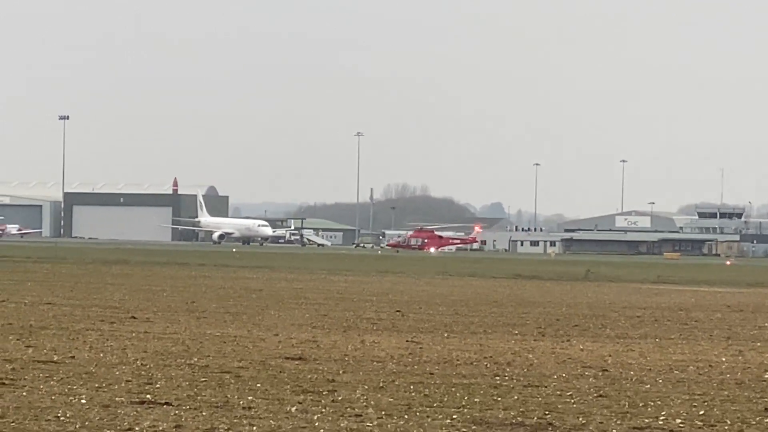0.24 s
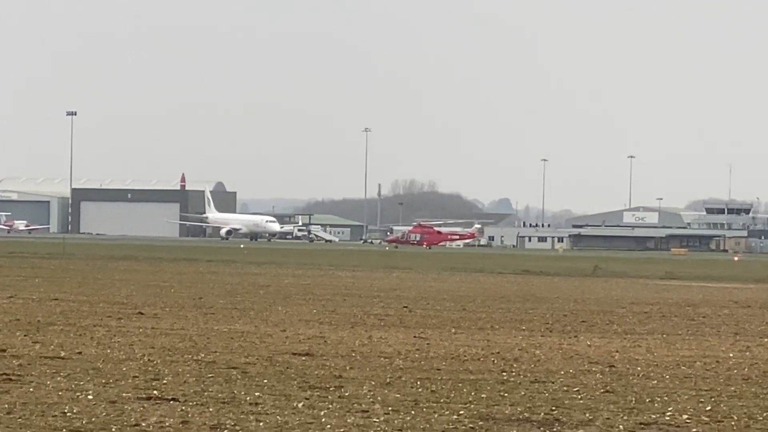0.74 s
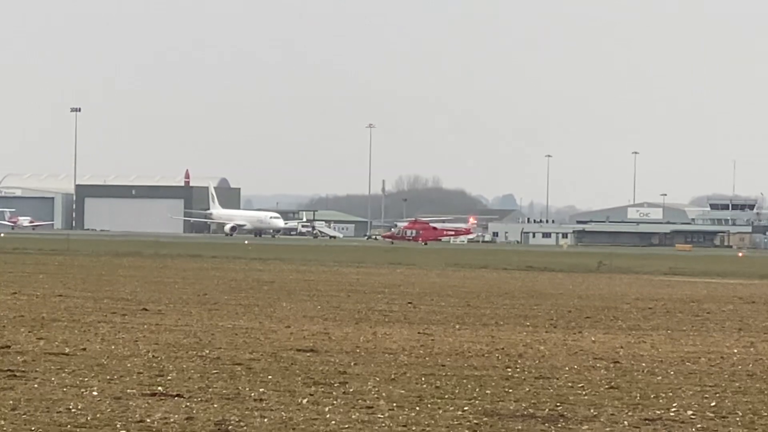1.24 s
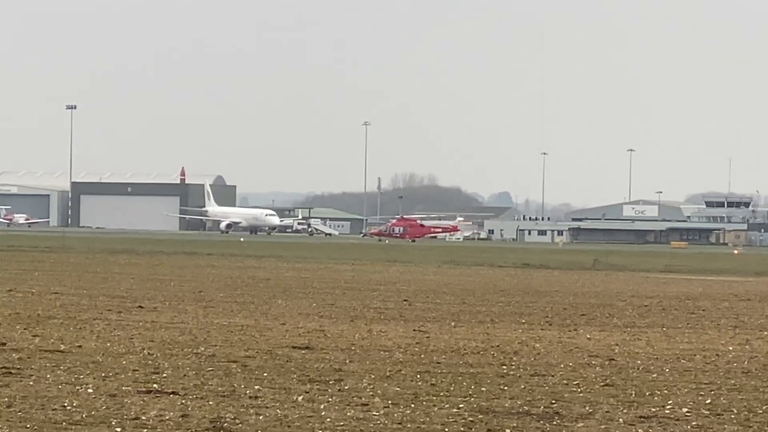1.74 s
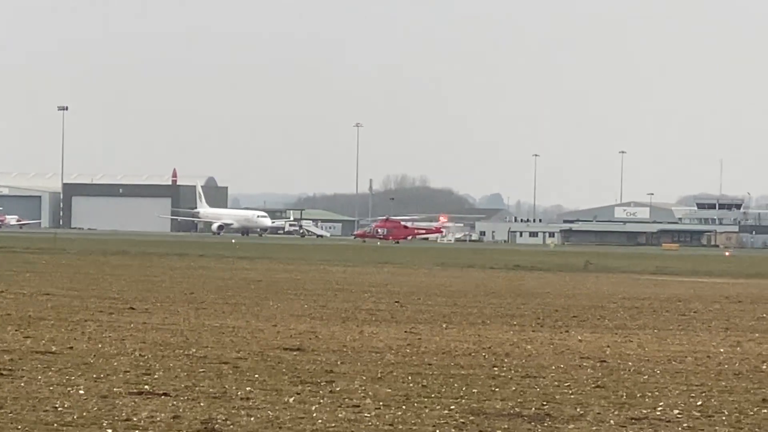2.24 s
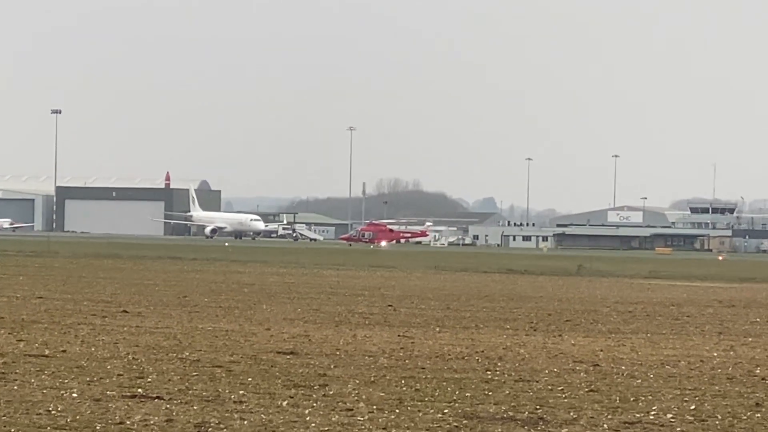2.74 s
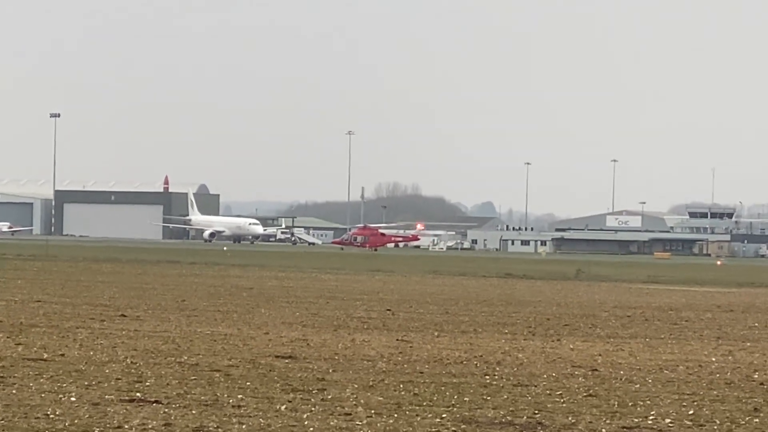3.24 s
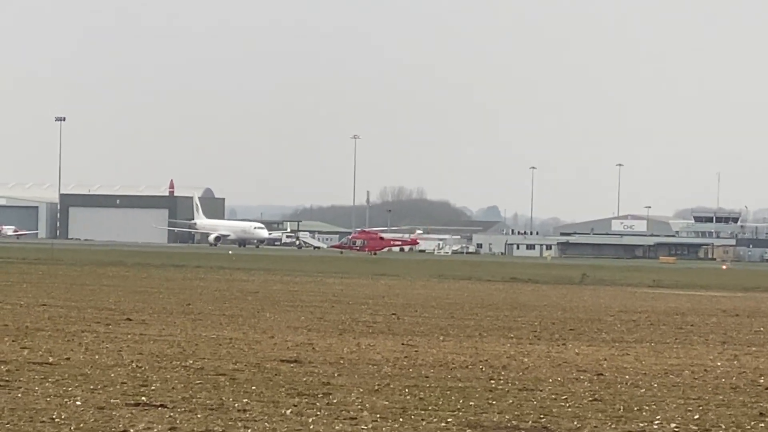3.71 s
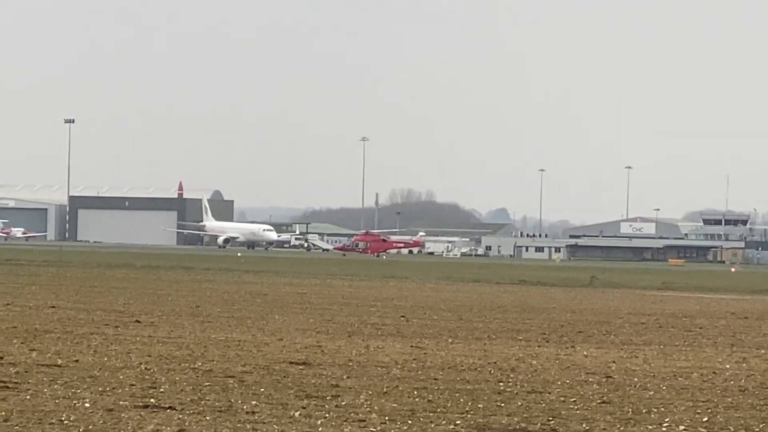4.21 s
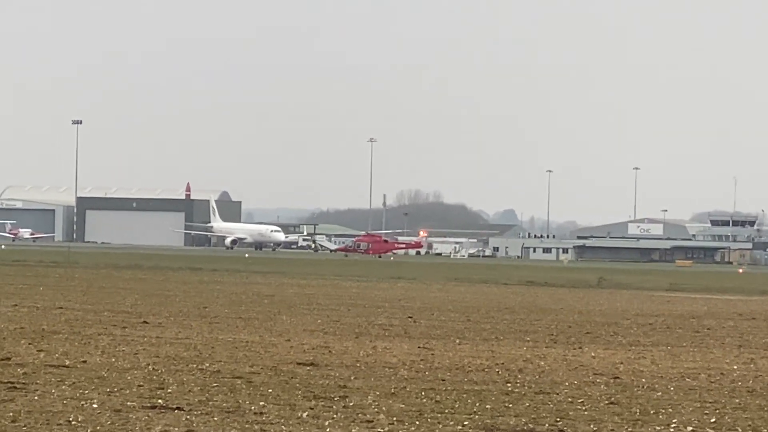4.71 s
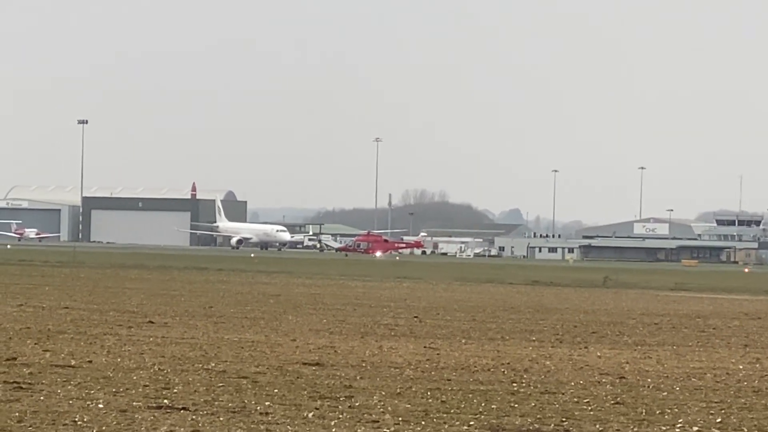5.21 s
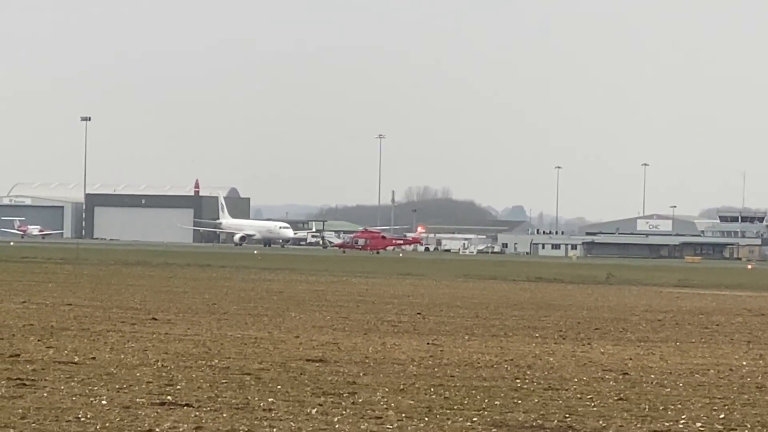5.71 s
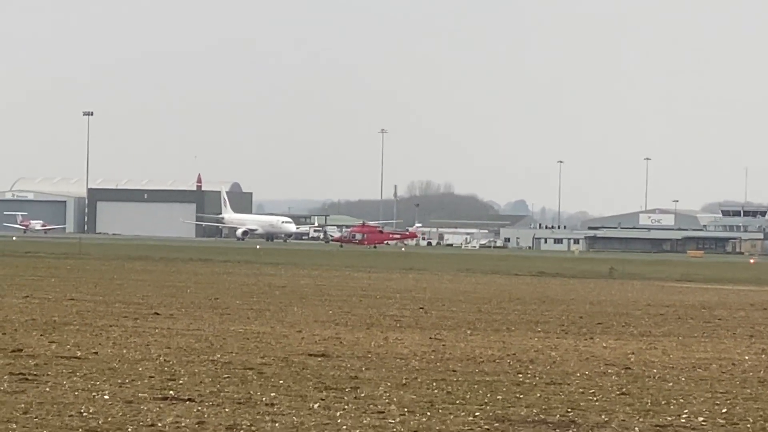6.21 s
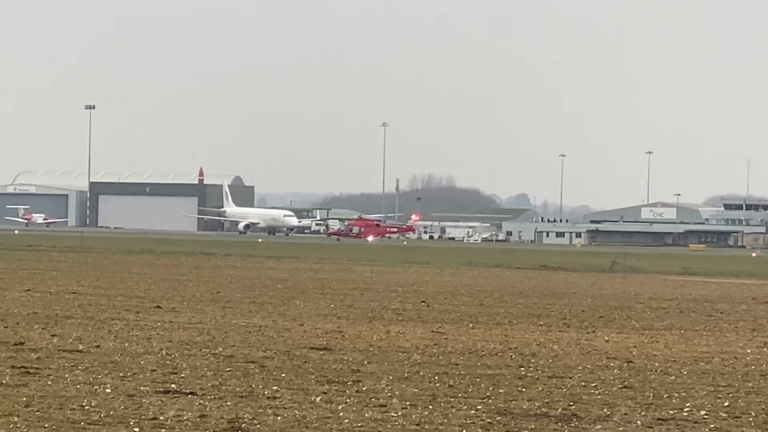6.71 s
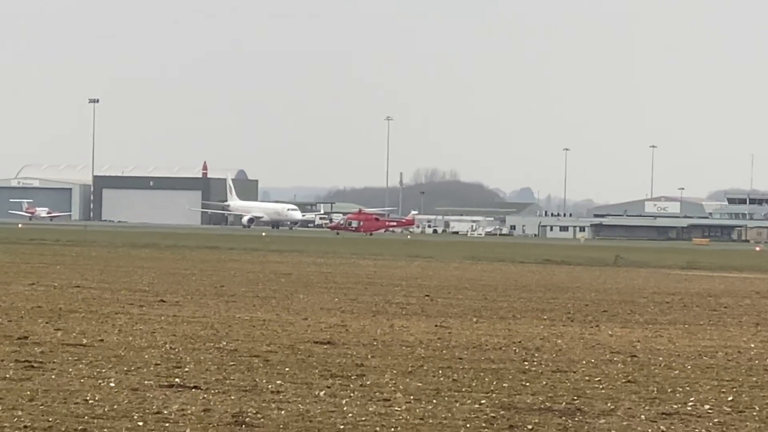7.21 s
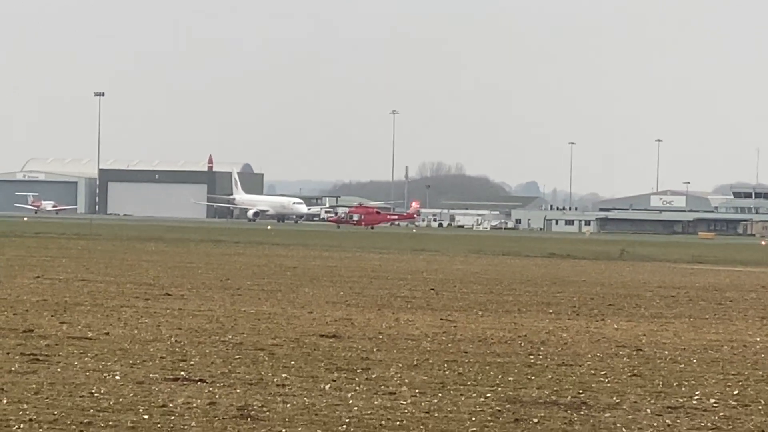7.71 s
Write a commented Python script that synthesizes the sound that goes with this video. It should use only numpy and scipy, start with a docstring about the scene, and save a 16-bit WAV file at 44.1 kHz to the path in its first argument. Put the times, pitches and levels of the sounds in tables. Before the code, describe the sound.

A distant helicopter drones and whooshes steadily across an airfield while an unseen car accelerates past, its note sagging, and wind thumps the microphone.

```python
"""A helicopter hover-taxis far across an airfield throughout: sine rotor tones, a throbbing noise wash and
turbine noise whose bands drift with the air. A car, its engine built from exhaust harmonics and its tyres
from noise, accelerates past out of sight; its note sags as it goes by and climbs again. Now and then wind
puffs, short low sine bursts with turbulence, thump the microphone; late on a bird, two gliding sines, chirps."""
import sys
import numpy as np
from scipy import signal
from scipy.fft import rfft, irfft, next_fast_len
from scipy.io import wavfile
from scipy.ndimage import uniform_filter1d, map_coordinates

SR = 44100
rng = np.random.default_rng(int(sys.argv[2]) if len(sys.argv) > 2 else 0)


def put_to_file(sound):
    """Save the sound as 16-bit audio at rate SR, in the file named by the first command-line argument."""
    columns = np.atleast_2d(sound).T  # one column per channel
    safe = np.clip(columns, -1, 1)
    whole_steps = np.round(safe * 32767)
    wavfile.write(sys.argv[1], SR, whole_steps.astype(np.int16))


N = 350595

PASS_S = 5.375  # when the car is nearest
# The car's side. Each row: time in seconds, side (positive is louder at left, negative at right).
BEARING = [(0, 0.047), (2, 0.36), (3.1, 0.73), (5.3, 0.69), (5.95, 0.23), (6.5, -0.51), (7.95, -0.48)]


def amp(db):
    """Decibels to gain."""
    return 10 ** (np.asarray(db) / 20)


def unit(x):
    """x at rms 1."""
    return x / np.sqrt(np.mean(x ** 2) + 1e-20)


def clock():
    """The time of each sample in seconds."""
    return np.arange(N) / SR


def curves(rows):
    """One value per sample for each column after the time."""
    s, *cols = np.transpose(rows)
    return [np.interp(clock(), s, c) for c in cols]


def wobble(knots_per_s):
    """A smooth random curve through normally distributed knots."""
    knots = rng.standard_normal(256)
    coarse_s = clock()[::64]
    curve = map_coordinates(knots, [coarse_s * knots_per_s], mode="wrap")
    return np.interp(clock(), coarse_s, curve)


def bell(s, width_s):
    """A smooth Gaussian swell of height 1 around time s; width_s is its standard deviation."""
    return np.exp(-.5 * np.minimum(((clock() - s) / width_s) ** 2, 200))


def filtered(x, response):
    """x times a response of frequency, with zero padding against wrap-around."""
    m = next_fast_len(N + SR // 2)
    return irfft(rfft(x, m) * response(np.fft.rfftfreq(m, 1 / SR)), m)[..., :N]


def rush(colour, patchy_db):
    """Coloured noise of rms 1, in time-frequency patches that come and go as the air stirs."""
    z = signal.stft(rng.standard_normal(N), nperseg=1024)[2]
    field = uniform_filter1d(rng.standard_normal(z.shape), size=9, axis=0)
    field = uniform_filter1d(field, size=26, axis=1)
    noise = signal.istft(z * amp(patchy_db * unit(field)), nperseg=1024)[1][:N]
    f, db = np.transpose(colour)
    return unit(filtered(noise, lambda hz: amp(np.interp(np.log(hz + 1), np.log(f), db))))


def wide(colour, patchy_db, side_db):
    """A stereo rush: a centre plus a diffuse part, opposite in the two channels."""
    mid = rush(colour, patchy_db)
    side = amp(side_db) * rush(colour, patchy_db)
    return np.array([mid + side, mid - side])


def aside(pair, right_lead_ms, left_db):
    """Place a source by the right channel's time lead and the left channel's excess level."""
    t = clock()
    shift_s = right_lead_ms / 2000  # half to each channel
    left = amp(left_db / 2) * np.interp(t - shift_s, t, pair[0])
    right = amp(-left_db / 2) * np.interp(t + shift_s, t, pair[1])
    return np.array([left, right])


def focused(pair, drift, octaves):
    """Bent by the wind, one drifting band arrives stronger or weaker than its neighbours."""
    hz, t, z = signal.stft(pair, SR, nperseg=1024)
    s, centre_hz, boost_db = np.transpose(drift)
    offset = np.log2((hz[:, None] + 1) / np.interp(t, s, centre_hz)) / octaves
    gain_db = np.interp(t, s, boost_db) * np.exp(-.5 * offset ** 2)
    return signal.istft(z * amp(gain_db), SR, nperseg=1024)[1][:, :N]


def rotors(blade_hz=28.91, throb=0.08, waver_db=0.5):
    """Main rotor drones, the tail rotor's tone fades and returns, beating against it; wash swells per blade."""
    # Each row: time in seconds, wash level in dB, tail rotor gain in dB.
    rotor_level = [(0, -38.5, -3.5), (.7, -39, 0), (1.3, -38, -1), (1.85, -36, 2), (2.3, -37.5, -1.5),
                   (3.1, -36, -2), (3.8, -37, -5.5), (4.25, -35.5, -6), (4.7, -32.5, -6), (5.4, -31.5, -6),
                   (5.9, -33.5, 1), (6.5, -39, 4), (7.05, -34.5, -1.5), (7.4, -33.5, -1), (7.95, -38, -8)]
    # Each row: frequency in Hz, relative level in dB per Hz.
    wash_colour = [(15, -31.5), (25, -19.5), (35, -14), (44, -7), (52, 2.5), (68, 1.5), (100, 0), (130, -4),
                   (200, -10), (300, -20), (500, -27.5), (900, -31.5), (2000, -94)]
    # Rotor tones. Each row: frequency in Hz, rms level in dB (the tail's before its gain).
    main_tones = [(28.91, -55.5), (57.81, -38.5), (86.74, -42.5)]
    tail_tones = [(81.8, -36), (163.6, -56)]
    t = clock()
    wash_level_db, tail_gain_db = curves(rotor_level)

    def tone(hz):
        level = np.sqrt(2) * amp(waver_db * wobble(4.1))
        return level * np.sin(2 * np.pi * (hz * t + rng.random()) + wobble(5) / 10)

    def drone(rows):
        return sum(amp(db) * tone(hz) for hz, db in rows)

    tones = drone(main_tones) + amp(tail_gain_db) * drone(tail_tones)
    beat = 1 + throb * np.cos(2 * np.pi * blade_hz * t)
    wash = amp(wash_level_db) * beat * wide(wash_colour, patchy_db=1, side_db=-13.5)
    return aside(tones + wash, right_lead_ms=0.51, left_db=0.3)


def turbines(hiss_trim_db=-1.5, fizz_trim_db=-1, flutter_db=0.32):
    """Exhaust roar, intake rush, hiss and treble fizz: noise bands that swell and fade with the air."""
    # Each row: time in seconds, roar level in dB, intake level in dB, hiss level in dB before trim.
    turbine_level = [(0, -46, -60.5, -86.5), (.5, -51.5, -64.5, -79.5), (.8, -50.5, -64.5, -77.5),
                     (1.15, -52.5, -61.5, -75.5), (1.75, -48.5, -59.5, -72), (2, -51.5, -60.5, -74.5),
                     (2.55, -51, -61.5, -76), (2.76, -50.5, -57.5, -68.5), (3.05, -49, -60, -72),
                     (3.35, -48.5, -58.5, -70.5), (3.8, -50, -56.5, -67), (4.25, -47.5, -57, -68),
                     (4.6, -46, -57, -74.5), (4.95, -47, -51, -69), (5.3, -49, -56, -72),
                     (5.5, -50, -59.5, -68), (5.8, -48.5, -62, -72.5), (6.0, -54.5, -67, -73),
                     (6.3, -56.5, -67.5, -75.5), (6.55, -53.5, -64.5, -75), (6.78, -52.5, -59.5, -67),
                     (7.3, -49.5, -61.5, -68.5), (7.95, -54, -64.5, -72)]
    # Each row: time in seconds, fizz level in dB before trim.
    fizz_level = [(0, -99), (.8, -96), (1.7, -84.5), (2.35, -93.5), (3.3, -78), (4.15, -68.5),
                  (4.75, -79.5), (5.1, -75.5), (6.45, -85), (6.75, -77.5), (7.95, -84.5)]
    # Noise colours. Each row: frequency in Hz, relative level in dB per Hz.
    roar_colour = [(300, -24), (600, -6), (900, 1), (1150, 0.5), (1500, 4), (2100, 2), (2600, -1),
                   (3000, -19), (3800, -24.5), (6000, -66)]
    intake_colour = [(1800, -28), (2800, 2.5), (3300, -1.5), (3850, -3.5), (4250, -9.5), (5000, -13.5),
                     (6200, -23.5), (9000, -55)]
    hiss_colour = [(3500, -25.5), (5000, -3), (6500, 2.5), (7300, 0.5), (7900, -1.5), (8300, -3.5),
                   (10000, -24.5)]
    fizz_colour = [(6500, -24), (8400, 4.5), (10000, -1.5), (12300, -3), (13000, -18)]
    # Drifting bands: roar, its upper edge, hiss, fizz. Each row: time in seconds, centre in Hz, boost in dB.
    roar_focus = [(0, 1100, 5.5), (.35, 1380, 5), (.7, 1370, 6), (1.1, 1680, 0), (1.7, 2160, 2),
                  (1.95, 1500, -2.5), (2.3, 1130, 10), (2.75, 1239, 0.5), (3.2, 1270, 5), (4.4, 1669, 0.5),
                  (4.7, 1950, 2), (4.95, 1980, 7), (5.15, 2020, 5), (5.5, 2160, 2.5), (6.6, 1778, -1.5),
                  (7.3, 2200, 7), (7.95, 2221, 0.5)]
    edge_focus = [(0, 2920, 3), (.6, 2600, -3), (1.2, 2500, 1), (2.4, 2510, -1.5), (3.3, 2400, -0.5),
                  (3.8, 2429, 4.5), (4.4, 2450, -2.5), (5.0, 2450, 5.5), (5.5, 2450, -1), (6.4, 2450, -2.5),
                  (7.2, 2400, 1), (7.95, 2400, -1)]
    hiss_focus = [(0, 5300, 0), (1, 5230, 2), (2.7, 5280, 7), (3.8, 5200, -1), (4.95, 4996, 2),
                  (5.5, 5200, -3), (6.2, 5600, -6), (7.95, 5200, -3.5)]
    fizz_focus = [(0, 9000, 8), (2, 9300, 6), (3.4, 9550, 4.5), (4.2, 10000, 2), (5.2, 11300, 5.5),
                  (6.2, 11600, 4), (6.8, 11700, 9.5), (7.95, 11700, 8.5)]

    roar_db, intake_db, hiss_db = curves(turbine_level)
    fizz_db, = curves(fizz_level)
    roar = amp(roar_db) * wide(roar_colour, patchy_db=1.62, side_db=-30.5)
    roar = focused(roar, roar_focus, octaves=0.13)
    roar = focused(roar, edge_focus, octaves=.09)
    intake = amp(intake_db) * wide(intake_colour, patchy_db=1.74, side_db=-19.0)
    hiss = amp(hiss_trim_db + hiss_db) * wide(hiss_colour, patchy_db=1.6, side_db=-27.5)
    hiss = focused(hiss, hiss_focus, octaves=.14)
    fizz = amp(fizz_trim_db + fizz_db) * wide(fizz_colour, patchy_db=1.4, side_db=-8)
    fizz = focused(fizz, fizz_focus, octaves=.09)
    return (roar + intake + hiss + fizz) * amp(flutter_db * wobble(14))


def engine(cylinders=8, waver_db=2.03):
    """Exhaust: firing note, boom an octave below, and uneven cylinders' overtones, loudest as it goes by."""
    # Each row: time in seconds, firing rate in Hz, firing note level in dB, half-rate boom level in dB.
    exhaust = [(0, 106.2, -46.5, -47), (.25, 115.3, -38, -51), (.85, 136, -42.5, -45.5),
               (1.35, 141.1, -39, -42), (2.3, 142, -38, -37.5), (3.2, 155.6, -34, -38),
               (3.66, 162.3, -35, -28.5), (4.08, 163.7, -35, -30.5), (4.27, 146.6, -33, -38),
               (4.45, 140, -30.5, -32.5), (4.8, 132.4, -29, -34.5), (5.18, 125.3, -35.5, -36),
               (5.5, 127.4, -33, -37.5), (6.25, 135.2, -39, -37), (6.62, 138.8, -31.5, -32),
               (7.15, 143.5, -43.5, -41.5), (7.95, 150.8, -50, -46.5)]
    # Each row: time in seconds, overall overtone level in dB.
    rasp_level = [(0, -67), (.6, -65), (1.2, -66), (2.2, -65), (2.8, -62), (3.4, -57.5), (4.5, -56),
                  (5, -57), (5.35, -55), (5.7, -60), (6.05, -62.5), (6.5, -59.5), (7, -63.5), (7.95, -66)]
    # Each row: multiple of the engine's cycle rate, relative level in dB.
    overtones = [(12, 4), (15, -2), (16, 9), (18, 3.5), (19, -2), (20, 7), (21, -1), (22, 5.5), (23, 1.5),
                 (24, 6), (25, -4), (26, -1), (27, -4), (28, 4), (29, -5.5), (30, -1), (32, -.5),
                 (34, -1.5), (36, -2), (38, -1), (40, -3.5), (44, -4.5), (46, -9)]
    # Tailpipe resonances. Each row: frequency in Hz, gain in dB.
    tailpipe = [(170, 7), (195, 4), (215, -2), (240, 0), (262, -3), (285, .5), (305, -.5), (328, 2),
                (350, 1), (372, 3), (400, -.5), (430, -1.5), (460, -4), (495, -1.5), (540, 1), (580, 2.5),
                (640, -5), (720, 0), (850, 2)]

    firing_hz, note_db, boom_db = curves(exhaust)
    side, = curves(BEARING)
    rasp_db, = curves(rasp_level)
    firings = np.cumsum(firing_hz) / SR
    shake_rad = .045 * wobble(18)

    def partial(k):
        return np.sqrt(2) * np.sin(2 * np.pi * (k * firings + rng.random()) + k * shake_rad)

    boom = amp(note_db) * partial(1) + amp(boom_db) * partial(.5)
    rasp = np.zeros(N)
    for multiple, db in overtones:
        k = multiple / cylinders
        pipe_db = np.interp(k * firing_hz, *np.transpose(tailpipe))  # glides through the resonances
        rasp += amp(rasp_db + db + pipe_db + waver_db * wobble(2.884)) * partial(k)
    boom_pair = aside([boom, boom], right_lead_ms=0.68, left_db=1.1)
    return boom_pair + aside([rasp, rasp], right_lead_ms=0.33 + 0.26 * side, left_db=6.9 * side)


def passing(falloff, leaving_db_per_s, dip_db):
    """Level in dB of passing tyre or body noise: falls with distance, drifts after the pass, dips briefly."""
    width_s = 0.3  # time to cover the nearest distance
    since_s = clock() - PASS_S
    distance = np.hypot(1, since_s / width_s)
    dip = dip_db * bell(6.06, width_s=0.14)
    return -falloff * 20 * np.log10(distance) + leaving_db_per_s * np.maximum(since_s, 0) - dip


def tyres(tread_db=-43.5, body_db=-39.5, sing_db=-52.0, sing_after_s=1.97, sing_width_s=0.41):
    """Tread roar sweeps across the stereo field above body rumble; the tread sings as the car draws away."""
    # Noise colours. Each row: frequency in Hz, relative level in dB per Hz.
    tread_colour = [(200, -29), (400, -1), (550, 7), (750, 3), (1000, 1.5), (1250, -0.5), (1600, -10),
                    (2200, -58)]
    body_colour = [(80, -30), (170, 4), (240, 11), (340, 4), (450, -1), (600, -13.5), (1000, -57.5)]
    sing_colour = [(700, -33), (1050, 6.5), (1250, -1), (1450, -6), (2000, -43.5)]

    side, = curves(BEARING)
    tread_level_db = tread_db + passing(falloff=0.39, leaving_db_per_s=1.1, dip_db=5.6)
    body_level_db = body_db + passing(falloff=0.67, leaving_db_per_s=0.2, dip_db=1.32)
    tread = amp(tread_level_db) * wide(tread_colour, patchy_db=2.0, side_db=-10.0)
    body = amp(body_level_db) * wide(body_colour, patchy_db=1.5, side_db=-23.5)
    sing_swell = amp(sing_db) * bell(PASS_S + sing_after_s, sing_width_s)
    tread += sing_swell * wide(sing_colour, patchy_db=4.0, side_db=-10)
    tread_pair = aside(tread, right_lead_ms=0.11 + .5 * side, left_db=6.8 * side)
    return tread_pair + aside(body, right_lead_ms=.17 + .07 * side, left_db=4.4 * side)


def puffs(width_cycles=0.55, wake_s=0.011):
    """Each eddy swings the diaphragm in a short burst; a smaller, quicker eddy and turbulence follow."""
    # Each row: time in seconds, push level in dB, push frequency in Hz, turbulence level in dB,
    # turbulence width in seconds.
    puff_rows = [(1.522, -16, 101, -26, 0.006), (1.538, -19.5, 185, -34, 0.004),
                 (1.554, -20.5, 55, -37, .012), (1.731, -23.5, 96, -29.5, 0.024),
                 (1.853, -20.5, 75, -40, .012), (2.65, -19.5, 50, -36, 0.0077),
                 (2.74, -20, 56.54, -42, 0.021), (4.487, -20, 62, -46, .015),
                 (6.745, -18.5, 65.26, -31.5, 0.031), (6.91, -21, 96.1, -36, 0.028),
                 (7.086, -20.5, 95, -38, .012), (7.159, -14.5, 68, -35, 0.016),
                 (7.179, -15.5, 88.6, -35, 0.012), (7.216, -9.5, 71.95, -31.5, 0.017),
                 (7.444, -23.5, 70, -40, .015), (7.486, -25, 90, -35, .008), (7.504, -19, 110, -29.5, 0.02),
                 (7.525, -13.5, 100, -29, 0.014), (7.553, -18, 190, -27, .006),
                 (7.562, -17.5, 85.3, -37, 0.008), (7.589, -19, 135, -27, 0.014),
                 (7.656, -15.5, 70.2, -40, 0.0076), (7.912, -25, 169.4, -36.5, 0.0067)]
    # Each row: frequency in Hz, relative level in dB per Hz.
    turbulence_colour = [(20, -14), (60, 7.5), (200, 0.5), (400, -13), (700, -19.5), (1000, -36),
                         (2500, -71)]
    lag_s, ratio, second_db = 0.01302, 1.94, -13.5  # the smaller eddy

    def eddy(s, hz):
        return bell(s, width_cycles / hz) * np.sin(2 * np.pi * hz * (clock() - s))

    push, swell = np.zeros(N), np.zeros(N)
    for s, db, hz, turbulence_db, width_s in puff_rows:
        push += amp(db) * (eddy(s, hz) + amp(second_db) * eddy(s + lag_s, ratio * hz))
        swell += amp(turbulence_db) * bell(s + wake_s, width_s)
    return push + swell * wide(turbulence_colour, patchy_db=5.5, side_db=-17.0)


def bird():
    """A thin rising whistle and a softer, higher note right after it: two gliding sines."""
    # Each row: time in seconds, width in seconds, frequency in Hz, rise in Hz per second, peak level in dB.
    chirps = [(6.671, .008, 4330, 5000, -61), (6.703, .009, 4510, 600, -67)]

    def whistle(s, hz, rise_hz_per_s):
        return np.sin(2 * np.pi * np.cumsum(hz + rise_hz_per_s * (clock() - s)) / SR)

    return sum(amp(db) * bell(s, width_s) * whistle(s, hz, rise) for s, width_s, hz, rise, db in chirps)


def scene():
    """Helicopter ahead, car to the side, wind at the microphone, a bird."""
    return rotors() + turbines() + engine() + tyres() + puffs() + bird()


def record(dry, ease_s=.008, bass_cut_hz=24., top_hz=12750):
    """Two ports differing in phase; fades at both ends, a deep-bass cut and a sharp upper band limit."""
    # Each row: frequency in Hz, phase in radians by which left leads.
    port_phase = [(2000, 0.05), (3200, 0.42), (4500, 0.3), (6000, 0.5), (7750, 0), (8200, 2.5),
                  (9600, 0.83), (10400, 1), (11800, 1.5)]
    t = clock()
    ease = np.sin(np.pi / 2 * np.clip(np.minimum(t, t[-1] - t) / ease_s, 0, 1)) ** 2

    def port_response(hz):
        lead_rad = np.interp(hz, *np.transpose(port_phase))
        return np.exp(np.outer([.5j, -.5j], lead_rad))

    def band_response(hz):
        return (hz < top_hz) * hz ** 2 / np.sqrt(hz ** 4 + bass_cut_hz ** 4)

    return filtered(filtered(dry * ease, port_response), band_response)


dry = scene()
out = record(dry)
put_to_file(out)
```